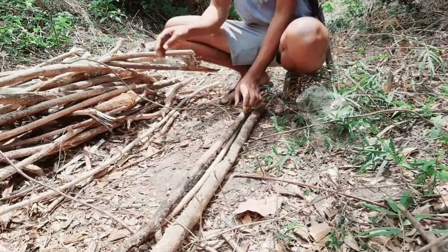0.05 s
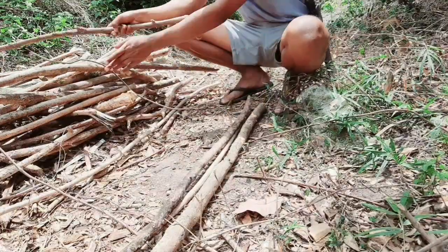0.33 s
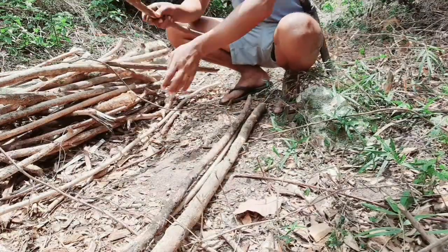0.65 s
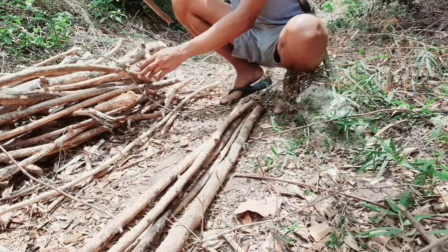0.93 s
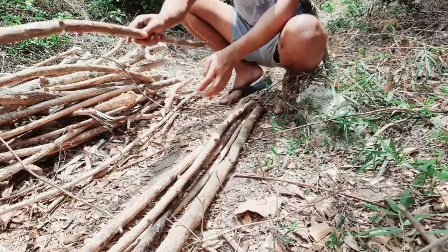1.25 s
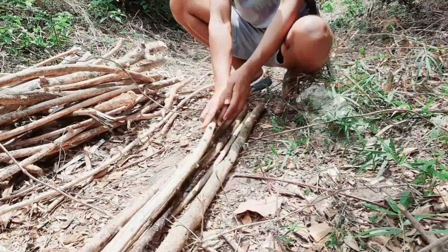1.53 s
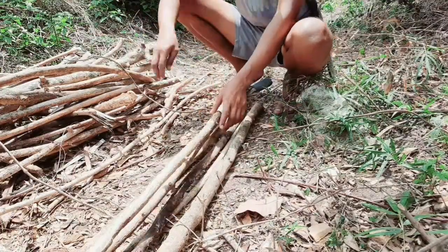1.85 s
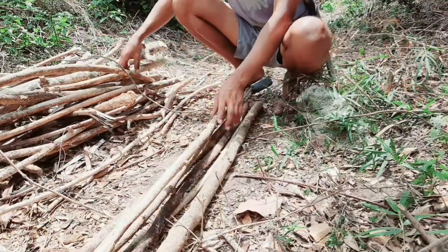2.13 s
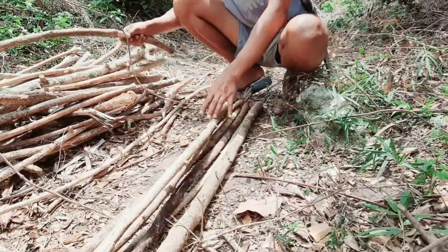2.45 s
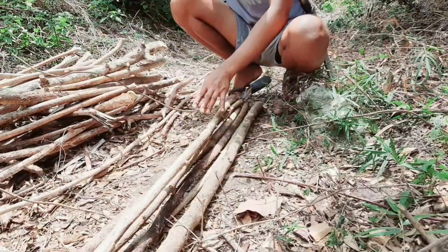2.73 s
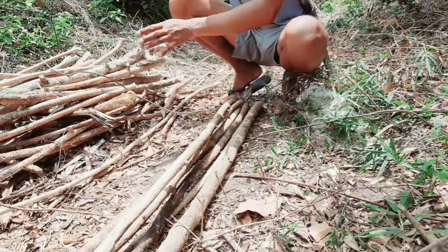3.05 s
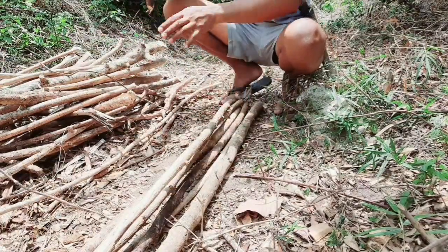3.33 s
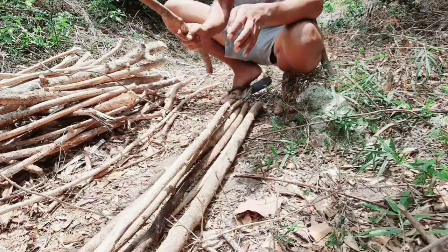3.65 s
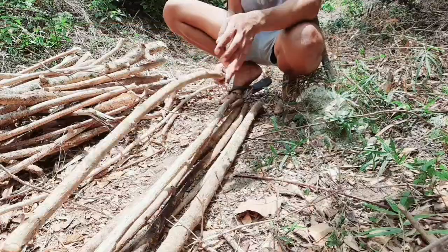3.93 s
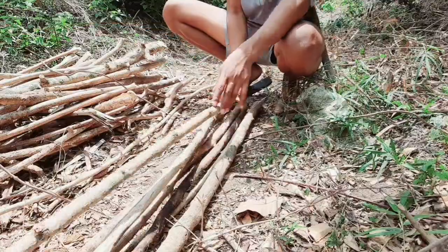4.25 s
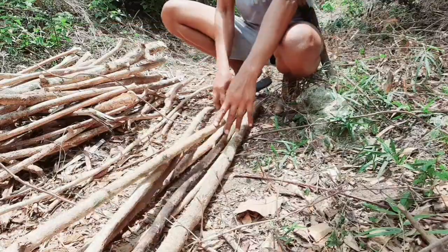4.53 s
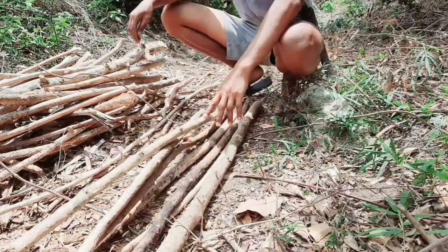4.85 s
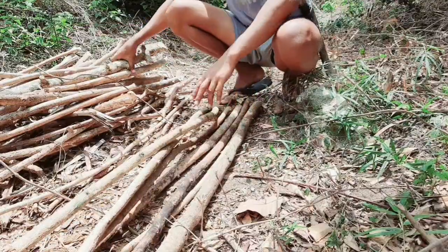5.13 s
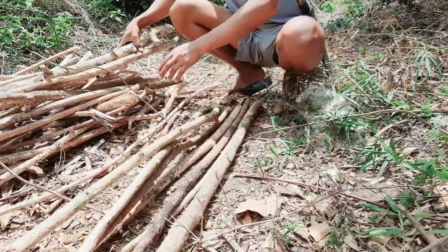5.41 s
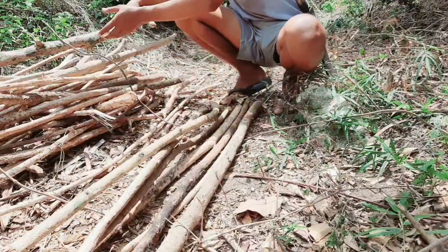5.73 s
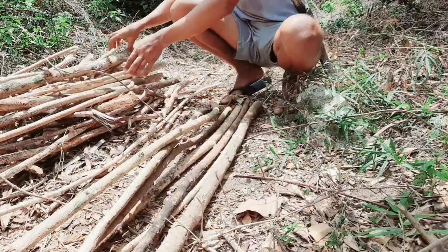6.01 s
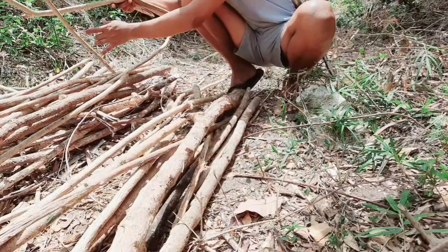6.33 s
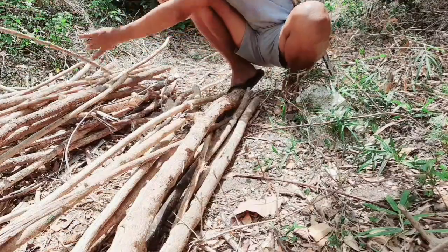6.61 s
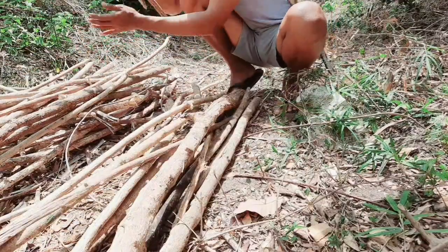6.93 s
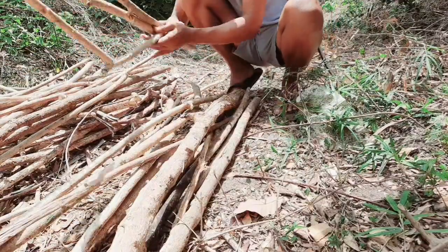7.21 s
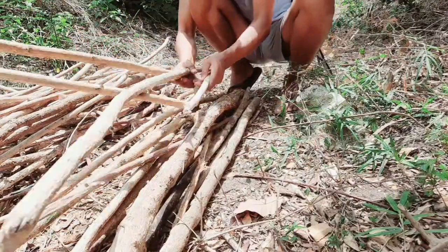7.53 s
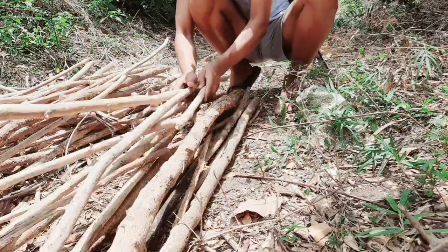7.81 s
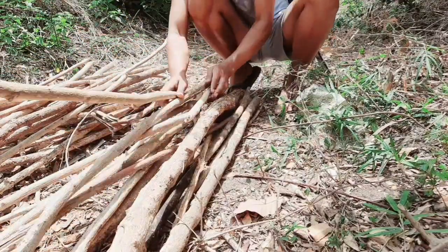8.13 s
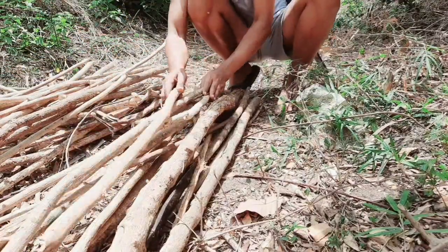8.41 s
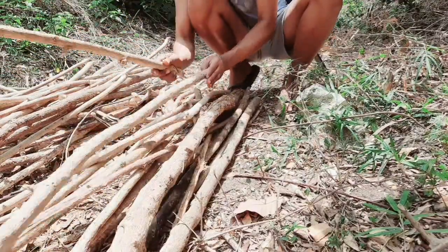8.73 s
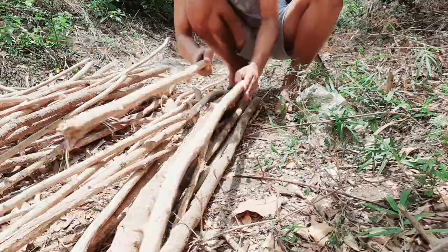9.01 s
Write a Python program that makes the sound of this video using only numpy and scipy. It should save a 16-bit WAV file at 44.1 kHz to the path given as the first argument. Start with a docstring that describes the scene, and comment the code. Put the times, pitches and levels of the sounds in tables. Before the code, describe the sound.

Close, uneven wooden knocks and clatters sound as someone piles dry sticks, with leaves crunching and twigs cracking between them. Thin sticks click first, then a branch drops with a ringing clack and a soft thud on soil. Busier dragging and duller knocks follow, with a thin squeak, and a stick finally bumps the microphone stand with a low boom. Faint insects and a far engine hum lie behind.

```python
"""Dry sticks knock and chatter as someone crouching on leaf litter pulls them from a heap and piles them.
Each hit rings the wood's bending modes; a long branch bounces and the soil thuds. Bark catches and
slips, leaves crackle, twigs snap. Near the end a thin squeak glides about, then a stick bumps the
microphone stand. Insects drone in the bushes over a low rumble, and an engine hums far away."""
import sys
import numpy as np
from scipy import signal
from scipy.fft import rfft, irfft, next_fast_len
from scipy.io import wavfile
from scipy.ndimage import uniform_filter1d

SR = 44100
rng = np.random.default_rng(int(sys.argv[2]) if len(sys.argv) > 2 else 0)


def generate_wav(sig):
    """Save sig (samples, or channels by samples) to the path in sys.argv[1] as 16-bit PCM at SR."""
    pcm = np.round(np.clip(np.atleast_2d(sig).T, -1, 1) * 32767).astype(np.int16)
    wavfile.write(sys.argv[1], SR, pcm)


N = 408807
TIME_S = np.arange(N) / SR

# Stick on stick. Each row: start in seconds, level in dB, thinness 0-1, freedom to ring 0-1,
# chatter time in seconds, the stick's own tone in Hz.
STICK_HITS = [(0.9328, -56.5, 1, 0.4, 0.0037, 1970), (1.3848, -47.5, 1, 0.06, 0.023, 2820),
              (1.5231, -53, 0.95, 0.15, 0.021, 1590), (1.5976, -48.5, 0.27, 0.46, 0.017, 557),
              (1.65, -57, 0.17, 0.3, 0.0088, 500), (1.813, -36.5, 1, 0.48, 0.0081, 2200),
              (1.829, -40.5, 0.68, 0.25, 0.0055, 2420), (1.8509, -45, 0.32, 0.37, 0.0055, 1880),
              (1.9455, -43.5, 0.79, 0.45, 0.0076, 1037), (2.3314, -48, 0.7, 0.18, 0.013, 1590),
              (2.5998, -53, 1, 0.46, 0.0062, 1700), (2.666, -42.5, 1, 0.38, 0.0092, 2640),
              (2.78, -44.5, 1, 0.5, 0.0055, 3200), (2.8141, -41, 1.0, 0.45, 0.017, 2340),
              (2.929, -36.5, 0.97, 0.39, 0.0088, 2450), (3.2834, -51.5, 1.0, 0.43, 0.0059, 1930),
              (3.9103, -34.5, 0.65, 0.82, 0.019, 940), (3.92, -26, 0.91, 0.36, 0.0049, 2097),
              (4.249, -53, 0.95, 0.73, 0.003, 1630), (4.357, -34, 0.76, 0.8, 0.0031, 1332),
              (4.366, -38, 0.76, 0.97, 0.0092, 2170), (4.372, -42.5, 0.21, 0.73, 0.013, 302),
              (4.848, -59, 1, 0.04, 0.024, 1900), (5.856, -37.5, 0.28, 0.96, 0.00094, 674.5),
              (5.8801, -32, 0.28, 1.0, 0.0022, 820), (5.991, -35.5, 0.15, 0.53, 0.011, 364),
              (6.026, -35.5, 0.59, 0.29, 0.011, 477), (6.3465, -60, 0.35, 1, 0.00093, 739.6),
              (6.533, -51.5, 0.59, 0.67, 0.017, 870), (6.677, -54, 0.69, 0.27, 0.014, 1814),
              (6.8638, -42.5, 0.4, 0.57, 0.017, 962.5), (7.0856, -48.5, 0.42, 0.2, 0.015, 1530),
              (7.125, -56, 0.02, 1, 0.0087, 289.8), (7.3627, -45, 0.34, 0.3, 0.014, 794.6),
              (7.402, -43.5, 0.0, 0.31, 0.01, 320), (7.4617, -44.5, 0.47, 0.17, 0.0066, 933.6),
              (7.487, -49.5, 0.06, 1, 0.01, 195), (7.763, -37, 0.9, 0.34, 0.0094, 2030),
              (7.832, -37, 0.25, 0.92, 0.0064, 1160), (7.86, -41.5, 0.2, 0.7, 0.005, 620),
              (7.883, -44, 0.08, 0.26, 0.0069, 317), (7.92, -45, 0.25, 0.2, 0.0033, 444),
              (8.1347, -54.5, 0.2, 0.5, 0.024, 585), (8.175, -58.5, 0.22, 0.55, 0.016, 395),
              (8.322, -55.5, 0.98, 0.37, 0.019, 1760), (9.14, -35, 0.27, 0.27, 0.0025, 1330),
              (9.195, -43.5, 0.46, 0.48, 0.0095, 710), (9.229, -43, 0.73, 0.14, 0.017, 1950),
              (9.259, -26.5, 0.12, 0.4, 0.0025, 747)]
# Bending modes of the sticks and of a long branch. Each row: frequency in Hz, relative level in dB.
STICK_MODES = [(105, -14.5), (155, -9), (195, -10), (293, 0.5), (325, 2), (385, -3.5), (510, -7.5),
               (590, -7), (680, -7.5), (760, -9.5), (842, -6.5), (945, -4), (1150, -16.5), (1376, -9.5),
               (1520, -5), (1780, 1.5), (1993, 8), (2178, -0.5), (2376, 6.5), (2754, 0.5), (2920, -2.5),
               (3400, -11.5), (3900, -3.5), (4630, -6.5), (5950, 7.5)]
BRANCH_MODES = [(263, -7), (305, -8), (382, -12.5), (437, -11), (593, -6.5), (845, -5), (944, -2),
                (1376, -5.5), (1779, -5), (1993, -4), (2178, 5.5), (2376, -3)]
# Branch landings. Each row: start in seconds, relative level in dB, upper edge of the contact in Hz.
BRANCH_LANDINGS = [(3.911, -39.5, 1000), (3.9215, -34, 5000), (4.359, -38, 2500), (4.386, -44.5, 400),
                   (4.445, -56, 300)]
# Soil under a stick's weight. Each row: start in seconds, relative level in dB, pitch in Hz.
SOIL_THUDS = [(3.925, -41, 105), (4.385, -46, 110), (7.404, -40, 170), (7.432, -40, 150), (7.48, -35, 175)]
# Twigs and bark flakes breaking. Each row: start in seconds, relative level in dB,
# decay time in seconds, twig resonance in Hz.
TWIG_SNAPS = [(0.5386, -36.5, 0.0023, 2700), (0.552, -43.5, 0.0019, 2400), (0.746, -44.5, 0.0032, 11300),
              (1.3844, -34, 0.004, 8500), (1.415, -36.5, 0.0015, 12500), (1.5, -48.5, 0.0089, 4480),
              (1.82, -45, 0.0013, 2960), (1.8277, -34.5, 0.0012, 3480), (1.946, -45, .0015, 2400),
              (1.961, -39, 0.0022, 7700), (2.466, -48.5, .004, 1900), (2.506, -48, .004, 2000),
              (2.637, -21.5, 0.0033, 8300), (2.817, -33.5, 0.0041, 6460), (2.835, -37, 0.003, 8200),
              (2.85, -28.5, 0.0011, 8640), (2.861, -39, 0.0035, 6450), (3.922, -28.5, 0.0028, 2900),
              (4.127, -50, .0015, 3000), (4.247, -43.5, 0.0038, 4500), (4.518, -39, 0.0082, 5070),
              (5.28, -40, 0.00097, 7750), (5.405, -53, .0008, 11500), (5.634, -56, .001, 6500),
              (5.689, -51, .001, 12500), (5.715, -55, 0.00099, 6500), (5.805, -45, 0.0089, 4000),
              (5.998, -30, 0.0088, 7400), (6.259, -46.5, 0.002, 7000), (6.31, -48, 0.00089, 7990),
              (6.517, -47.5, 0.0035, 7000), (6.851, -44, 0.017, 6480), (6.99, -43, 0.002, 12100),
              (7.083, -46, 0.0018, 13010), (7.2142, -43, 0.002, 8000), (7.465, -44, .003, 7000),
              (7.882, -42, 0.0053, 6300), (8.42, -51, .003, 8020), (8.956, -52.5, 0.0042, 7000),
              (9.139, -35, 0.0015, 4960)]
# Pulls and pushes through heap and litter. Each row: start in seconds, length in seconds,
# relative leaf level in dB, relative bark level in dB.
DRAG_STROKES = [(0.2, 0.2, -72, -87), (1.382, 0.39, -59.5, -62.5), (1.602, 0.087, -54, -56.5),
                (1.817, 0.14, -57.5, -53), (2.231, 0.33, -55.5, -65.5), (2.448, 0.035, -51.5, -54.5),
                (2.601, 0.3, -46, -50), (3.206, 0.057, -60.5, -93), (3.905, 0.05, -43.5, -58),
                (4.009, 0.095, -50, -49.5), (4.124, 0.3, -56, -59), (4.393, 0.11, -54, -53),
                (4.534, 0.62, -69, -73.5), (4.811, 0.07, -57, -60), (5.076, 0.26, -62, -78),
                (5.252, 0.17, -50.5, -55.5), (5.423, 0.92, -56.5, -68.5), (5.563, 0.54, -51.5, -59),
                (5.747, 0.36, -50, -50), (5.957, 0.058, -38, -42.5), (6.04, 0.2, -56, -65),
                (6.32, 2.08, -61.5, -85.5), (6.506, 0.13, -56.5, -62), (6.838, 0.047, -52, -55.5),
                (6.891, 0.06, -53, -53.5), (7.084, 0.18, -59, -69), (7.29, 0.16, -52, -67),
                (7.323, 0.21, -51, -62), (7.503, 0.53, -59, -75), (7.785, 0.16, -48.5, -52),
                (7.995, 0.18, -59.5, -60), (8.256, 0.38, -63, -75.5), (8.388, 0.044, -52.5, -63),
                (9.073, 0.33, -54, -85)]
# Bumps on the stand. Each row: start in seconds, relative level in dB.
STAND_BUMPS = [(9.157, -13), (9.1639, -13.5), (9.172, -12.5), (9.181, -16.5), (9.2452, -3), (9.253, -8.5)]
# Modes of the stand. Each row: frequency in Hz, relative level in dB, T60 in seconds.
STAND_MODES = [(166.6, -7, 0.19), (316, 8.5, 0.03995), (369, 10.5, 0.025)]
# Friction squeaks. Each row: start in seconds, length in seconds, first pitch in Hz, last pitch in Hz,
# relative level in dB, waver as a share of the pitch.
FRICTION_SQUEAKS = [(7.14, 0.13, 2014, 1975, -56, 0.01), (7.277, 0.15, 1940, 1683, -52, 0.012),
                    (7.63, 0.041, 1910, 2170, -54, 0.007), (7.66, 0.14, 2183, 2470, -54, 0.02),
                    (7.747, .11, 1815, 1980, -48, 0.068), (7.95, 0.059, 2130, 2020, -54, .012)]
# Partials of squeak and engine. Each row: multiple of the pitch or turning rate, relative level in dB.
SQUEAK_HARMONICS = [(1, -15), (2, -18), (3, 0)]
ENGINE_HARMONICS = [(4, -1), (5, -7), (6, -1.5)]
# Noise spectra. Each row: frequency in Hz, relative spectral density in dB.
BARK_SPECTRUM = [(80, -10.5), (160, -16), (320, -2), (480, -4.5), (900, -5.5), (2100, -1), (3200, -2.5),
                 (5000, -7.5), (9000, -29)]
LEAF_SPECTRUM = [(1200, -33), (2800, -8), (4200, -2.5), (7800, 1.5), (12000, -2.5), (15000, -3),
                 (16500, -33.5)]
CRACK_SPECTRUM = [(300, -30), (1500, -14), (2400, -5), (3050, -9.5), (3850, -3), (5200, -7), (8000, 0.5),
                  (12000, -5), (14200, 2), (16000, 0.5)]
INSECT_SPECTRUM = [(4500, -44.5), (5600, -15), (6300, -9.5), (6700, 1.5), (7250, -7), (7800, 2),
                   (8300, -5.5), (9200, -15), (11000, -23.5)]
RUMBLE_SPECTRUM = [(30, -33), (70, -7), (112, -2.5), (150, -3), (220, -13.5), (600, -43)]
AIR_SPECTRUM = [(20, -26.5), (55, 1), (120, -8.5), (210, -14.5), (330, -6), (500, -15.5), (1100, -21),
                (2200, -21.5), (5000, -26.5), (9000, -50)]
HISS_SPECTRUM = [(2000, -11), (5000, -21.5), (12000, 26), (16000, -2)]
# Level curves of far engine and rumble. Each row: time in seconds, level in dB.
ENGINE_CURVE = [(5, -88), (6.3, -73), (9.27, -76.5)]
RUMBLE_CURVE = [(0, -86.5), (7, -71.5), (9.27, -77)]
# Likeness of left and right. Each row: frequency in Hz, coherence 0-1.
COHERENCE = [(60, 0.43), (200, 0.45), (600, 0.0054), (1500, 0.29), (3000, 0.032), (16000, 0)]
# Three wood registers and one bark register. Each entry: band edge in Hz.
BAND_EDGES_HZ = [95, 500, 1400, 3500, 16000]


def stick_knocks(click_db, softening):
    """Sticks hit and chatter; a stick's thickness sets the strength of each register."""
    out, t = np.zeros((2, N)), TIME_S[:int(.35 * SR)]
    bands_hz = np.transpose([BAND_EDGES_HZ[:-1], BAND_EDGES_HZ[1:]])
    registers = [signal.butter(4, band, "band", fs=SR, output="sos") for band in bands_hz]
    centres_hz = np.sqrt(bands_hz.prod(axis=1))
    for start_s, levels_db, chatter_s, tone_hz, freedom in blows():
        wood = stick_ring(t, tone_hz, freedom)
        wood[0] += from_db(click_db)
        force = contacts(t, max(chatter_s, .001), rate_hz=2200, size_db=-4)
        force = colour(force, list(zip(centres_hz, softening * levels_db)))
        blow = signal.fftconvolve(force, wood)[:len(t)]
        blow = outdoors(blow, near_db=-2, near_t60_s=.05, far_db=-11, far_t60_s=.24)
        for register, db in zip(registers, levels_db):
            part = signal.sosfilt(register, blow)
            add(out, start_s, level_attack(part, db, attack_s=max(.02, 2 * chatter_s)))
    return out * pan(3.5)


def blows(heavy_below=.67, settle_chatter_s=.021, settle_hz=296, settle_freedom=.38):
    """Yield each hit; a heavy stick also rocks the pile, which drops back with a dull rattle."""
    for start_s, db, thinness, freedom, chatter_s, tone_hz in STICK_HITS:
        levels_db = register_levels_db(db, thinness, freedom)
        yield start_s, levels_db, chatter_s, tone_hz, freedom
        if thinness < heavy_below:
            settle_db = register_levels_db(levels_db[0] - 7, 0, settle_freedom)
            yield start_s + .05, settle_db, settle_chatter_s, settle_hz, settle_freedom


def register_levels_db(db, thinness, freedom, fall_below_db=23.5, fall_above_db=13, bark_db=-19.5):
    """Thick sticks peak in register one, thin ones in three; a held stick grinds in all of them."""
    steps = np.arange(3) - 2 * thinness
    wood_db = -freedom * np.maximum(fall_above_db * steps, -fall_below_db * steps)
    wood_db -= 20 * np.log10(np.linalg.norm(from_db(wood_db)))
    return db + np.append(wood_db, freedom * bark_db)


def stick_ring(t, tone_hz, freedom, t60_1khz_s=.026, damping_slope=.85, detune=.03):
    """Dry wood rings briefly, high modes shortest; a free stick holds its own tone longer."""
    hz, db = np.transpose(STICK_MODES)[:, :, None]
    octaves = np.abs(np.log2(hz / tone_hz))
    own = np.argmin(octaves)
    hz = hz * np.exp(detune * rng.standard_normal(hz.shape))
    hz[own], db[own] = tone_hz, db[octaves < .5].max() - 4
    free_ring_s = .068 * freedom ** 2 / (1 + (tone_hz / 1900) ** 2)
    base_t60_s = np.full(hz.shape, t60_1khz_s)
    base_t60_s[own] += free_ring_s * min(1, tone_hz / 1000) ** damping_slope
    t60_s = base_t60_s * (hz / 1000) ** -damping_slope
    ring = ring_modes(t, hz, strike_gains(db, spread_db=1.1), t60_s)
    return ring / np.linalg.norm(ring)


def branch_bounces(trim_db, t60_1khz_s=.15, damping_slope=.27):
    """A long branch rings after each landing; soft bounces stir mainly its low modes."""
    out, t = np.zeros((2, N)), TIME_S[:int(.35 * SR)]
    hz, db = np.transpose(BRANCH_MODES)[:, :, None]
    t60_s = t60_1khz_s * (hz / 1000) ** -damping_slope
    for start_s, landing_db, edge_hz in BRANCH_LANDINGS:
        gains = strike_gains(db, spread_db=1.5) / (1 + (hz / edge_hz) ** 2)
        ring = ring_modes(t, hz, gains, t60_s)
        ring = outdoors(ring, near_db=-8, near_t60_s=.04, far_db=-17, far_t60_s=.24)
        add(out, start_s, level_attack(ring, landing_db + trim_db, attack_s=.03))
    return out * pan(3.5)


def soil_thuds(trim_db, rise_s=.008, t60_s=.041):
    """Soft soil gives way and swings back for a few cycles."""
    out, t = np.zeros((2, N)), TIME_S[:int(.15 * SR)]
    swell = (1 - np.exp(-t / rise_s)) ** 2 * from_db(-60 * t / t60_s)
    swell /= swell.max()
    for start_s, db, hz in SOIL_THUDS:
        add(out, start_s, from_db(db + trim_db) * swell * np.sin(2 * np.pi * hz * t) * pan(2))
    return out


def twig_snaps(trim_db, ring_db, ring_q):
    """Dry fibres break in a rush of tiny bright cracks, coloured by the twig's resonance."""
    out, t = np.zeros((2, N)), TIME_S[:int(.25 * SR)]
    for start_s, db, decay_s, hz in TWIG_SNAPS:
        crack = colour(contacts(t, decay_s, rate_hz=16000, size_db=-2.5), CRACK_SPECTRUM)
        crack += from_db(ring_db) * signal.lfilter(*signal.iirpeak(hz, ring_q, fs=SR), crack)
        crack = outdoors(crack, near_db=3, near_t60_s=.006, far_db=-4, far_t60_s=.12)
        add(out, start_s, level_attack(crack, db + trim_db, attack_s=.006))
    return out * pan(1.2)


def dragging(bark_trim_db, leaf_trim_db, jerk_db=.5):
    """Bark catches and slips on bark while crushed leaves crackle and small twigs tick."""
    bark = sliding_resonances(colour(grains(rate_hz=4500, spread_db=2, clump_db=2), BARK_SPECTRUM))
    leaves = rms_one(colour(grains(rate_hz=13000, spread_db=-2, clump_db=.9), LEAF_SPECTRUM))
    twigs = rms_one(colour(grains(rate_hz=70, spread_db=2.2, clump_db=2), CRACK_SPECTRUM))
    litter = leaves + from_db(-2.5) * twigs
    bark_power = leaf_power = 0
    for start_s, length_s, leaf_db, bark_db in DRAG_STROKES:
        rubbing = stroke(start_s, length_s, t60_s=.3)
        crushing = stroke(start_s, length_s, t60_s=.35)
        settling = from_db(-11) * stroke(start_s, length_s, t60_s=.57)   # leaves creak back
        bark_power += (from_db(bark_db + bark_trim_db) * rubbing) ** 2
        leaf_power += (from_db(leaf_db + leaf_trim_db) * np.maximum(crushing, settling)) ** 2
    bark *= from_db(jerk_db * drift(54))
    return (bark * np.sqrt(bark_power) + litter * np.sqrt(leaf_power)) * pan(1.1)


def stroke(start_s, length_s, t60_s):
    """Gain of one pull: swell, hold, release. Long pulls start more slowly."""
    t = TIME_S - start_s
    swell = np.clip(t / (.03 + .077 * length_s), 0, 1)
    return swell * from_db(-60 * np.clip((t - length_s) / t60_s, 0, 2))


def sliding_resonances(scrape, range_hz=(1100, 5510), depth_db=2.2):
    """Resonances swell and fade as the contact slides along the stick."""
    edges_hz = np.geomspace(*range_hz, num=9)
    out = scrape
    for band in zip(edges_hz, edges_hz[1:]):
        resonance = signal.sosfilt(signal.butter(1, band, "band", fs=SR, output="sos"), scrape)
        out = out + (from_db(depth_db * drift(25)) - 1) * resonance
    return rms_one(out)


def stand_bumps(trim_db, rise_s=.0076, right_db=-21):
    """Knocks travel up the stand and boom mostly in the left microphone."""
    out, t = np.zeros((2, N)), TIME_S[:int(.2 * SR)]
    hz, db, t60_s = np.transpose(STAND_MODES)[:, :, None]
    boom = ring_modes(t, hz, from_db(db), t60_s) * (1 - np.exp(-t / rise_s))
    sides = from_db([[0], [right_db]])
    for start_s, bump_db in STAND_BUMPS:
        add(out, start_s, from_db(bump_db + trim_db) * boom * sides)
    return out


def squeaks(trim_db, flutter_db):
    """Friction makes faint, unsteady tones with a strong third partial; glides flatten at the top."""
    out = np.zeros(N)
    for start_s, length_s, first_hz, last_hz, db, waver in FRICTION_SQUEAKS:
        progress = np.clip((TIME_S - start_s) / length_s, 0, 1)
        from_top = progress if first_hz > last_hz else 1 - progress
        glide_hz = max(first_hz, last_hz) - abs(first_hz - last_hz) * from_top ** 2
        phase = 2 * np.pi * np.cumsum(glide_hz * (1 + waver * drift(700))) / SR
        tone = sum(from_db(partial_db) * np.sin(k * phase) for k, partial_db in SQUEAK_HARMONICS)
        swell = 2 * np.sqrt(progress * (1 - progress))
        out += from_db(db + trim_db + flutter_db * drift(60)) * swell * tone
    return out


def insects(level_db):
    """A far chorus: a high band of noise that flickers slightly."""
    return noise(INSECT_SPECTRUM) * from_db(level_db + .5 * drift(60))


def engine_hum(turning_hz, waver, unsteady_db):
    """Three low partials of a far engine waver together and fade in past the middle."""
    phase = 2 * np.pi * np.cumsum(turning_hz * (1 + waver * drift(2))) / SR
    hum = sum(from_db(db + unsteady_db * drift(5.5)) * np.sin(k * phase) for k, db in ENGINE_HARMONICS)
    return rms_one(hum) * from_db(np.interp(TIME_S, *np.transpose(ENGINE_CURVE)))


def ambience(air_db, hiss_db):
    """A distant rumble grows, then eases, over quiet air and hiss."""
    rumble = noise(RUMBLE_SPECTRUM) * from_db(np.interp(TIME_S, *np.transpose(RUMBLE_CURVE)))
    return rumble + from_db(air_db) * noise(AIR_SPECTRUM) + from_db(hiss_db) * noise(HISS_SPECTRUM)


def outdoors(x, near_db, near_t60_s, far_db, far_t60_s, left_lead_s=.0002):
    """Direct sound, quick scatter from ground and heap, and a faint tail from the bushes."""
    t = TIME_S[:len(x)]
    paths = 0
    for db, t60_s in ((near_db, near_t60_s), (far_db, far_t60_s)):
        echoes = stereo(rng.standard_normal((2, len(t)))) * from_db(-60 * t / t60_s)
        paths += from_db(db) * rms_one(echoes) / np.sqrt(len(t))
    paths[0, 0] += 1
    paths[1, int(left_lead_s * SR)] += 1
    return signal.fftconvolve(x[None], paths, axes=1)[:, :len(t)]


def contacts(t, decay_s, rate_hz, size_db):
    """A first touch, then uneven rebounds that die away; a long slide starts softer than a tap."""
    touches = (rng.random(len(t)) < rate_hz / SR) * rng.standard_normal(len(t))
    envelope = np.exp(-t / decay_s) * (1 - np.exp(-t / (.21 * decay_s)))
    force = from_db(size_db) * touches * envelope
    force[0] = 1 / (1 + (decay_s / .028) ** 2)
    return force


def grains(rate_hz, spread_db, clump_db):
    """Clumps of tiny uneven clicks, reaching each ear by its own path; rms 1."""
    clicks = rng.random(N) < rate_hz / SR
    sizes = clicks * from_db(spread_db * np.minimum(rng.exponential(1, N), 5))
    envelope = uniform_filter1d(sizes ** 2, size=16).clip(0) ** .5
    clumps = from_db(clump_db * drift(90))
    return rms_one(stereo(envelope * clumps * rng.standard_normal((2, N))))


def strike_gains(db, spread_db):
    """Mode gains with random scatter and sign."""
    return from_db(db + rng.normal(0, spread_db, db.shape)) * rng.choice([-1, 1], db.shape)


def ring_modes(t, hz, gains, t60_s):
    """Sum of decaying sines, one per row."""
    return np.sum(gains * np.sin(2 * np.pi * hz * t) * from_db(-60 * t / t60_s), axis=0)


def noise(spectrum):
    """Steady stereo noise, rms 1."""
    return rms_one(colour(stereo(rng.standard_normal((2, N))), spectrum))


def colour(x, spectrum):
    """Minimum-phase filter with the given spectrum."""
    size = next_fast_len(x.shape[-1] // 2 + 1024) * 2
    hz, db = np.transpose(spectrum)
    grid_hz = np.maximum(np.fft.rfftfreq(size, 1 / SR), 1)
    gains = from_db(np.interp(np.log(grid_hz), np.log(hz), db))
    cepstrum = irfft(np.log(gains))
    cepstrum[1:size // 2] *= 2
    cepstrum[size // 2 + 1:] = 0
    return irfft(rfft(x, size) * np.exp(rfft(cepstrum)))[..., :x.shape[-1]]


def stereo(pair):
    """Blend two unrelated signals: partly alike in the bass, apart in the treble."""
    size = next_fast_len(pair.shape[1])
    coherence = np.interp(np.fft.rfftfreq(size, 1 / SR), *np.transpose(COHERENCE))
    angle = np.arcsin(coherence) / 2
    spectra = rfft(pair, size)
    return irfft(np.cos(angle) * spectra + np.sin(angle) * spectra[::-1], size)[:, :pair.shape[1]]


def drift(rate_hz):
    """Random wander, rms 1."""
    knots_s = np.arange(0, N / SR + 1, 1 / rate_hz)
    return rms_one(np.interp(TIME_S, knots_s, rng.standard_normal(len(knots_s))))


def level_attack(x, db, attack_s):
    """Scale so that the first attack_s has an rms of db."""
    return x * from_db(db) / np.sqrt(np.mean(x[:, :int(attack_s * SR)] ** 2))


def add(out, start_s, sound):
    """Mix in a short stereo sound."""
    at = min(round(start_s * SR), N - 1)
    out[:, at:at + sound.shape[1]] += sound[:, :N - at]


def pan(left_db):
    """Channel gains, left louder than right by left_db."""
    return rms_one(from_db([[left_db / 2], [-left_db / 2]]))


def from_db(db):
    """Decibels to gain."""
    return 10 ** (np.asarray(db) / 20)


def rms_one(x):
    """Scale to unit rms."""
    return x / np.sqrt(np.mean(x ** 2) + 1e-20)


def scene():
    """Sticks, litter, squeaks, stand and background."""
    wood = stick_knocks(click_db=4.5, softening=.89) + branch_bounces(trim_db=-2.5)
    soil = soil_thuds(trim_db=-4)
    cracks = twig_snaps(trim_db=2.5, ring_db=-3, ring_q=3.5)
    litter = dragging(bark_trim_db=.5, leaf_trim_db=.14)
    squeal = squeaks(trim_db=-2, flutter_db=3)
    background = insects(level_db=-63) + ambience(air_db=-75.5, hiss_db=-84)
    engine = engine_hum(turning_hz=27.8, waver=.0098, unsteady_db=3)
    return wood + soil + cracks + litter + squeal + stand_bumps(trim_db=-1.5) + background + engine


def record(dry, dip_hz=(9000, 10300), cutoff_hz=15550):
    """The microphone port has a dip in the treble; the top is cut."""
    dip = .55 * signal.sosfilt(signal.butter(1, dip_hz, "band", fs=SR, output="sos"), dry)
    return signal.sosfilt(signal.ellip(10, .2, 80, cutoff_hz, fs=SR, output="sos"), dry - dip)


dry = scene()
out = record(dry)
generate_wav(out)
```